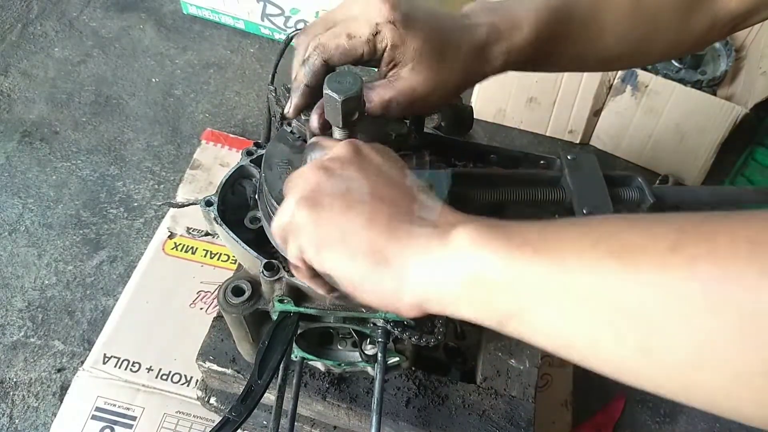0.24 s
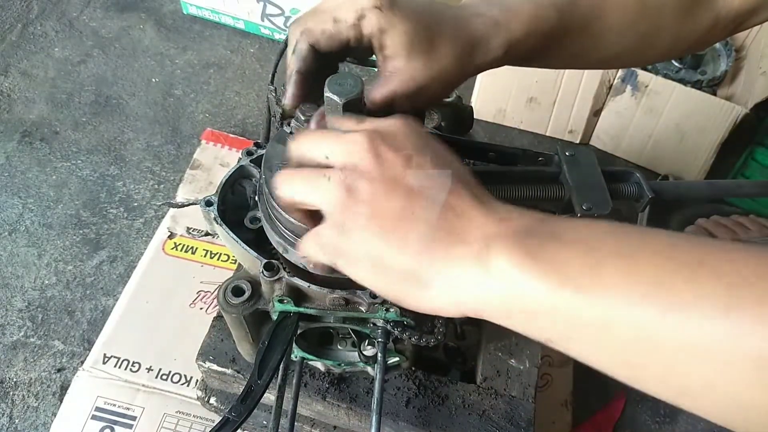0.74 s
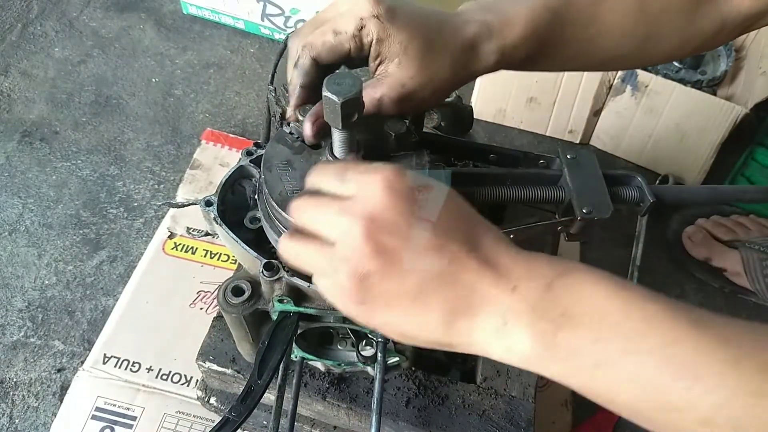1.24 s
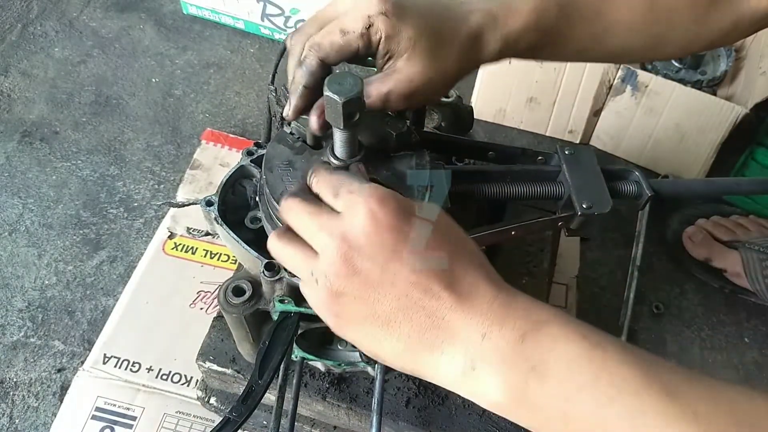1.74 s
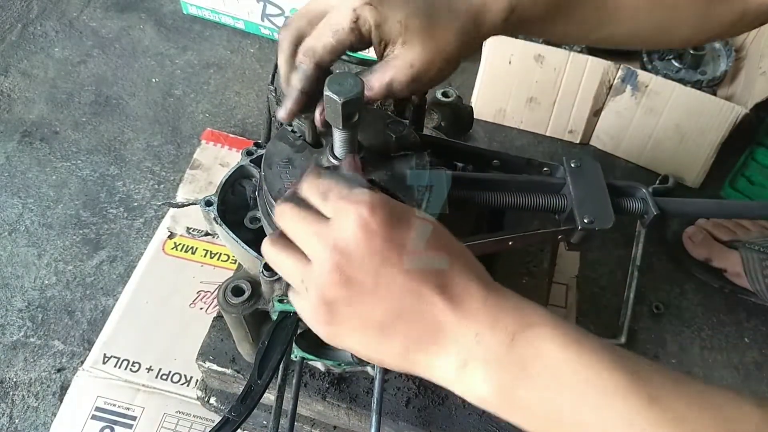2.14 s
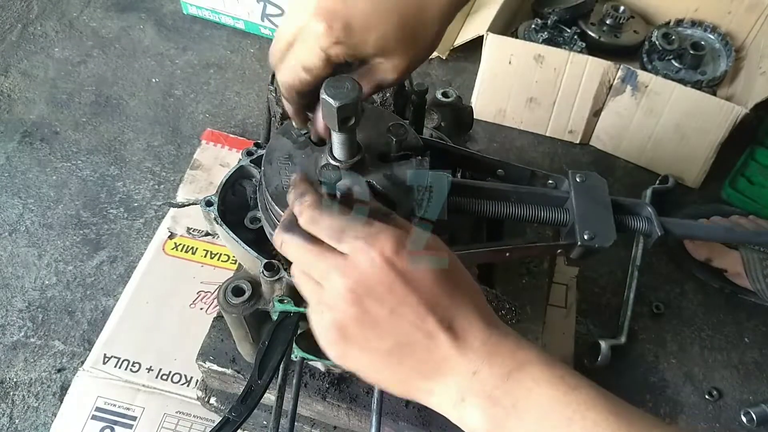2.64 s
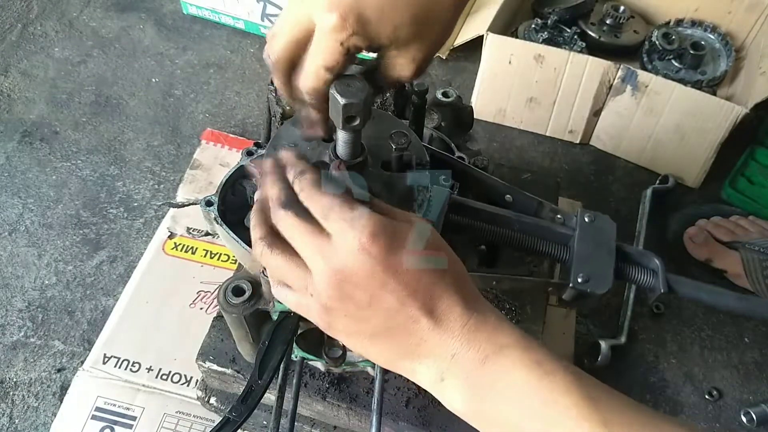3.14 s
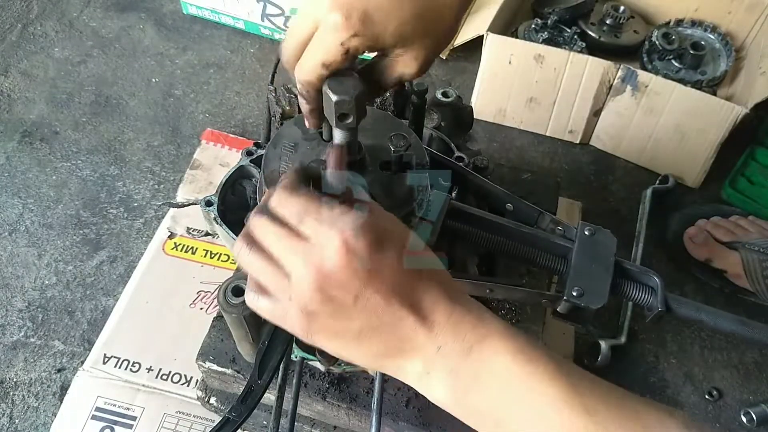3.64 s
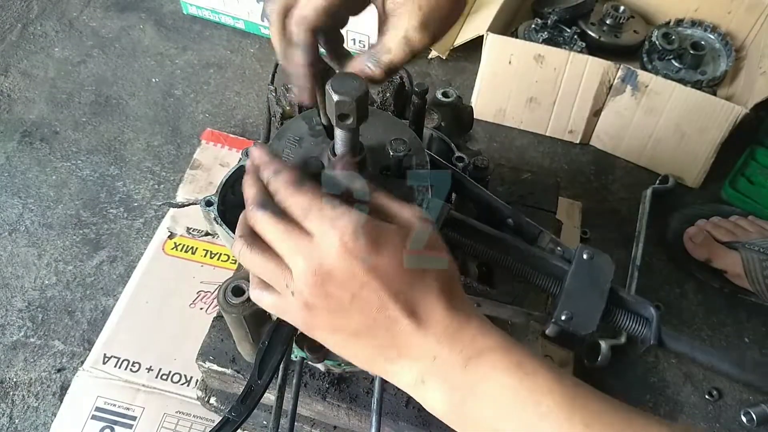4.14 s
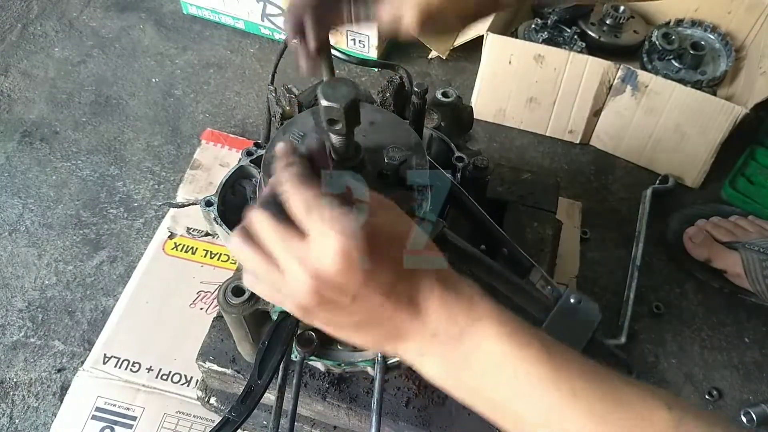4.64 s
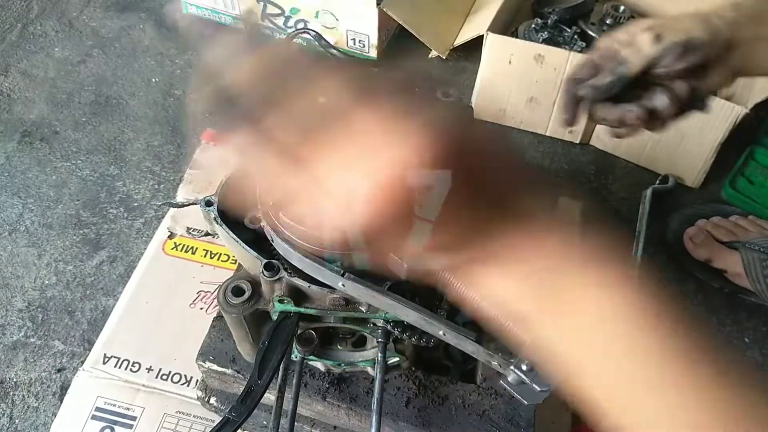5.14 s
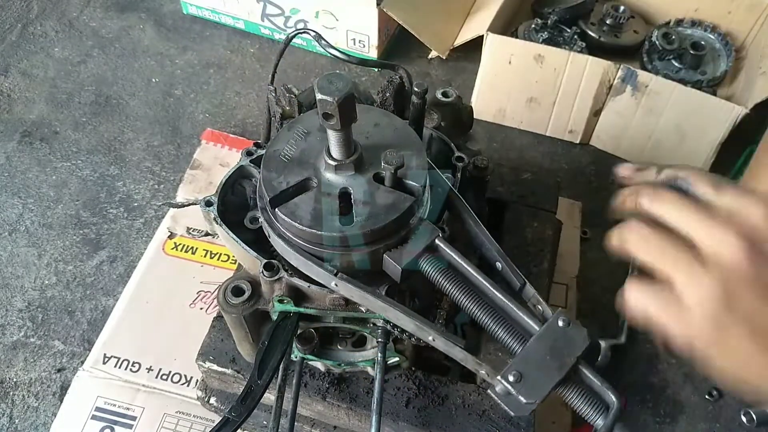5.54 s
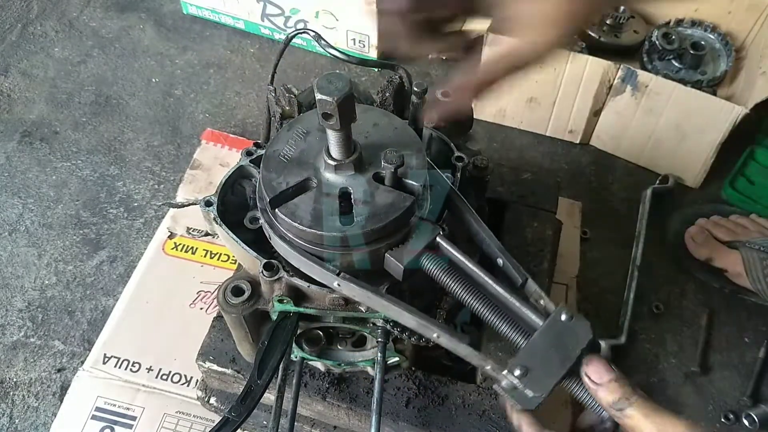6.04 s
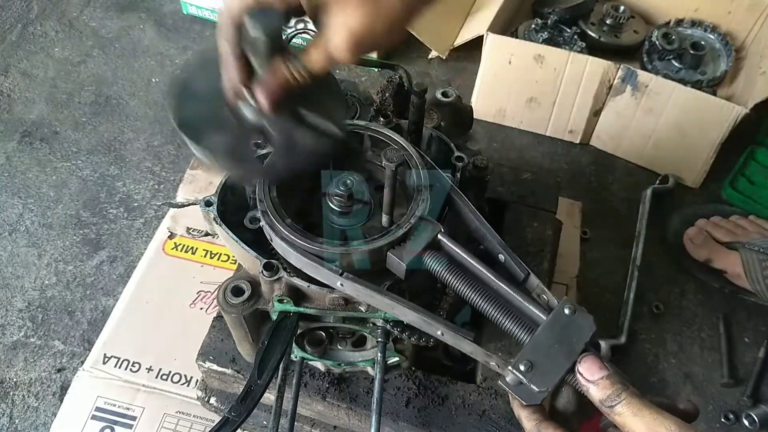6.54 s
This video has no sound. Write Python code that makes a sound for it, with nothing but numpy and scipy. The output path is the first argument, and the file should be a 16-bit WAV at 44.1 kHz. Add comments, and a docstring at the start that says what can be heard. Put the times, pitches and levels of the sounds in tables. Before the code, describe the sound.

A quiet open-air workshop yard, with low distant traffic and a thin, uneven rustle. A dove coos throughout: a short note at 0.6-0.95 s, a longer rising and dipping phrase at 1.2-2.3 s, a brief coo at 3 s, another long phrase at 3.5-4.9 s, a short one at 5.5 s and a last from 6 s to the end. The tone is round, gliding around 500-700 Hz, throaty at its faint edges and wavering with echoes. Close hands make barely audible ticks at first and a soft swish near 2.2 s. A clearer steel tick comes at 3.8 s, then scrapes, knocks and small rings crowd 4.3-5.0 s. A spanner meets concrete at 5.4 s with bright, high clinks, again at 5.75, 5.85 and 5.97 s. A soft bump, faint scrape and lingering steel tone follow around 6.4 s.

```python
"""Beside an open-air workshop a dove coos: a gliding tone whose wall echoes beat with it, so that it wavers.
Close by, hands work a puller bolt on an engine's steel flywheel: rough contacts tick, scrape, knock
the engine case and ring damped modes. A steel spanner is put down on concrete with a few bright clinks.
Steel sometimes sings on one mode, soft bands of noise swish, and distant traffic rumbles underneath."""
import sys
import numpy as np
from scipy import signal
from scipy.fft import rfft, irfft, next_fast_len
from scipy.io import wavfile
from scipy.ndimage import uniform_filter1d, map_coordinates

SR = 44100
rng = np.random.default_rng(int(sys.argv[2]) if len(sys.argv) > 2 else 0)


def put_to_file(sound):
    """Save the sound as 16-bit audio at rate SR, in the file named by the first command-line argument."""
    columns = np.atleast_2d(sound).T  # one column per channel
    safe = np.clip(columns, -1, 1)
    whole_steps = np.round(safe * 32767)
    wavfile.write(sys.argv[1], SR, whole_steps.astype(np.int16))


N = 299880

# coherence of the sound field at the two microphones: (frequency [Hz], correlation [-1 to 1])
COHERENCE = [(30, 0.17), (130, 0.83), (600, 0.86), (1100, 1), (4300, 1), (5500, 0.42), (14000, 0.054)]


def amp(db):
    """Level to amplitude ratio: 20 dB is a factor of ten."""
    return 10 ** (np.asarray(db) / 20)


def unit(x):
    """Normalization of the mean power: scale to rms 1."""
    return x / np.sqrt(np.mean(x ** 2) + 1e-20)


def along(points, hz):
    """Interpolation of (frequency [Hz], value) points on a logarithmic frequency axis."""
    f, v = np.transpose(points)
    return np.interp(np.log(hz + 1), np.log(f + 1), v)


def curves(rows):
    """Linear interpolation in time: one value per sample for each column after the time [s]."""
    s, *columns = np.transpose(rows)
    t = np.arange(N) / SR
    return [np.interp(t, s, column) for column in columns]


def wobble(rate):
    """Slow random modulation: a smooth spline through random knots, rate knots a second."""
    knots = rng.standard_normal(int(N * rate / SR) + 4)
    return map_coordinates(knots, [np.arange(N) * rate / SR])


def jitter(t, rate):
    """Angular random modulation: straight lines between random knots, rate knots per unit of axis t."""
    knots = rng.standard_normal(int(t[-1] * rate) + 4)
    return map_coordinates(knots, [t * rate], order=1)


def noise(spectrum, size, ripple_db=0):
    """Spectral shaping and partial coherence: coloured stereo noise of rms 1, less alike in the treble."""
    hz = np.fft.rfftfreq(size, 1 / SR)
    # mid and side in the ratio cos : sin of half the angle give the wanted correlation
    turn = np.arccos(np.clip(along(COHERENCE, hz), -1, 1)) / 2
    # the ripple stands for a body's many close resonances, one knot every 110 Hz
    gain = amp(along(spectrum, hz) + ripple_db * jitter(hz, 1 / 110))
    white = rfft(rng.standard_normal((2, size)))
    mid, side = irfft(white * gain * [np.cos(turn), np.sin(turn)], size)
    return unit(np.array([mid + side, mid - side]))


def patchy(x, depth_db, size):
    """Non-stationary noise: narrow bands come and go through a smoothed random time-frequency gain."""
    z = signal.stft(x, nperseg=size)[2]
    field = rng.standard_normal(z.shape[1:])
    field = uniform_filter1d(field, size=2, axis=0)
    field = uniform_filter1d(field, size=6, axis=1)
    y = signal.istft(z * amp(depth_db * unit(field)), nperseg=size)[1]
    return unit(y[:, :N])


def add(track, s, sound):
    """Linear superposition: mix a sound into the track from time s [s]."""
    start = max(round(s * SR), 0)
    track[:, start:start + sound.shape[1]] += sound[:, :max(N - start, 0)]


def swell(t, rise):
    """Gradual onset: growth from -36 dB to 0 dB by time rise [s], a softened attack."""
    return amp(-36 * np.clip(1 - t / rise, 0, 1) ** 2.0)


def decay(t, rise, t60):
    """Exponential damping: after time rise [s] the level falls 60 dB in t60 [s]."""
    return amp(-60 * np.maximum(t - rise, 0) / t60)


def rough_contact(spectrum, t, rise, t60, grain_db):
    """Rough contact excites dense, short-lived modes: a grainy noise burst swells and dies."""
    lowest_db = spectrum[0][1]
    # small parts are poor radiators of deep bass
    coloured = noise([(60, lowest_db - 22), (120, lowest_db), *spectrum], len(t), ripple_db=3.5)
    grain = amp(grain_db * jitter(t, 600))
    return coloured * swell(t, rise) * decay(t, rise, t60) * grain


def ring(modes, t, rise, rattle):
    """Modal superposition: damped sines, each wavering in level and phase through the loose contact."""
    hz, db, t60 = np.transpose(modes)[:, :, None]
    # each blow loads the steel differently and shares its energy anew
    hz = hz * (1 + .002 * rng.standard_normal(hz.shape))
    strength = amp(db + 2 * rng.standard_normal(hz.shape))
    shake, slip = rattle * np.array([[jitter(t, 118) for _ in modes] for _ in range(2)])
    phase = 2 * np.pi * (hz * t + rng.random(hz.shape)) + slip
    fade = strength * np.exp(shake) * decay(t, rise, t60)
    # short waves reach the two microphones out of step
    apart = np.arccos(np.clip(along(COHERENCE, hz), -1, 1)) / 2 * rng.choice([-1, 1], hz.shape)
    channels = [(fade * np.sin(phase + way * apart)).sum(0) for way in (1, -1)]
    tone = swell(t, rise) * np.array(channels)
    return .5 * tone / np.std(tone[:, :SR // 25])  # rms 0.5 over the first 40 ms


def yard(x):
    """Reverberation as convolution: walls and floor answer, each frequency dying at its own rate."""
    # decay of the yard: (frequency [Hz], t60 [s])
    yard_t60 = [(600, 0.59), (12000, 0.21)]
    diffuse = noise([(100, 0.011), (10000, 0.032)], SR // 2)
    hz, t, z = signal.stft(diffuse, SR, nperseg=256)
    tail = signal.istft(z * amp(-60 * t / along(yard_t60, hz)[:, None]), SR, nperseg=256)[1]
    return signal.fftconvolve(x, tail / np.linalg.norm(tail[0]), axes=1)[:, :N]


def background():
    """Broadband ambient noise: distant traffic rumble under the uneven rustle of yard and working hands."""
    # course of the two noises: (time [s], rumble level [dB], rustle level [dB])
    air = [(0, -60, -77), (1.0, -60.5, -83), (2.5, -58, -76), (5.4, -60.5, -75), (6.15, -57, -63.5),
           (6.8, -55, -85)]
    # spectrum of the traffic: (frequency [Hz], relative level [dB])
    rumble_spectrum = [(65, -30), (80, -61.5), (100, -1), (188, 4), (225, -6.5), (420, -12), (650, -15),
                       (900, -27), (4000, -35)]
    # spectrum of the rustle: (frequency [Hz], relative level [dB])
    rustle_spectrum = [(700, -27), (1150, -1.5), (1700, -2), (2600, 2), (8000, 1), (15500, -13)]
    rumble_db, rustle_db = curves(air)
    rumble = patchy(noise(rumble_spectrum, N), depth_db=5.0, size=4096)
    rumble = amp(rumble_db + 1.6 * wobble(11.0)) * rumble * amp([[-1.8], [2.3]])  # left, right [dB]
    rustle = patchy(noise(rustle_spectrum, N, ripple_db=1.5), depth_db=4.5, size=512)
    rustle = amp(rustle_db + 1.6 * wobble(14) + 1.2 * wobble(55)) * rustle
    return rumble + rustle


def swishes():
    """Band-limited noise under an envelope: soft swishes and bumps rise and fade."""
    # soft sounds: (start [s], time scale [s], centre [Hz], half-width to -4 dB [octaves], level [dB])
    soft_sounds = [(1.644, 0.18, 3566, 0.27, -63.5), (1.693, 0.16, 274.5, 0.074, -54),
                   (2.159, 0.11, 6743, 1, -58), (6.452, 0.031, 355, 0.35, -47)]
    skirt = [(-8, 90), (-2, 24), (-1, 4), (0, 0), (1, 4), (2, 24), (8, 90)]  # (half-widths, fall [dB])
    out, t = np.zeros((2, N)), np.arange(2 * SR) / SR
    for s, length, hz, octaves, db in soft_sounds:
        band = [(hz * 2 ** (k * abs(octaves)), -fall) for k, fall in skirt]
        shape = swell(t, .15 * length) * np.exp(-1.5 * (t / length) ** 2)
        add(out, s, amp(db) * shape * noise(band, len(t), ripple_db=4.5))
    return out


def singing(waver_db=2.5, waver_rad=0.76):
    """Friction-sustained vibration: rubbing keeps one mode going, wavering as the contact shifts."""
    # steel that rubs or rocks: (start [s], time scale [s], frequency [Hz], level [dB])
    sung_notes = [(0.488, 0.096, 3920, -66), (2.181, 0.3, 2625, -71.5), (2.865, 0.21, 3920, -66),
                  (2.94, 0.35, 2596, -71), (3.58, .2, 3926, -73), (3.841, 0.23, 2603, -71.5),
                  (5.157, 0.51, 2529, -73), (5.97, 0.056, 4223, -37), (6.35, 0.2, 3904, -60),
                  (6.432, 0.16, 4075, -58)]
    out, t = np.zeros((2, N)), np.arange(SR) / SR
    for s, length, hz, db in sung_notes:
        tone = np.sin(2 * np.pi * hz * t + waver_rad * jitter(t, 70))
        tone = tone * amp(db + waver_db * jitter(t, 54))
        shape = swell(t, .2 * length) * np.exp(-.4 * t / length - (t / length) ** 4)
        add(out, s, np.array([tone, tone]) * shape)
    return out


def spanner(rise=0.019, lead=0.014):
    """Impact excitation of a bar: clatter on concrete, jaws ringing high and shank bending lower."""
    # landing and settling, levels before the trims below:
    # (time [s], overall level [dB], clatter level [dB], low-mode level [dB], thud level [dB])
    landings = [(5.4307, -20, 2, -4.5, -41), (5.4393, -19, -7, -21, -45), (5.453, -30, -7.5, -16, -44),
                (5.488, -23, -14, -31.5, -30.5), (5.7401, -19.5, -25.5, -17.5, -22.5),
                (5.7524, -24, -25.5, -16.5, -37), (5.7712, -41, -16.5, 7.5, -6),
                (5.8518, -11, -30, -29, -23.5), (5.8673, -17, -32, -16, -29.5),
                (5.9629, -32, -30, -2.5, -11.5)]
    # bending modes of the shank: (frequency [Hz], level [dB], t60 [s])
    shank_modes = [(4220, -12.5, 0.15), (4270, -22.5, 0.1)]
    # modes of the jaws, t60 before the floor's damping: (frequency [Hz], level [dB], t60 [s])
    jaw_modes = [(10690, -6, .3), (10762, -4, .24), (10860, 0, .28), (10975, -3, .21), (11145, -14, .14)]
    # spectrum of the clatter: (frequency [Hz], relative level [dB])
    clatter_spectrum = [(1000, -27.5), (3300, -19), (4050, -2), (4900, -17.5), (6200, -5), (8000, -3),
                        (8480, 5), (8900, 2.5), (10125, 5.5), (11050, 8), (11800, 0.5), (15300, 4)]
    # thud of the concrete: (frequency [Hz], relative level [dB])
    ground_spectrum = [(150, -36), (430, 11), (830, 5), (1050, -4), (2400, 1.5), (5000, -1.5)]
    out, t = np.zeros((2, N)), np.arange(SR // 2) / SR
    # the floor quickly takes most of the jaws' ring
    grounded = 0.25 + np.exp(-np.maximum(t - rise, 0) / 0.012)
    for s, db, clatter_db, low_db, thud_db in landings:
        clatter = amp(clatter_db + 0.5) * rough_contact(clatter_spectrum, t, rise, t60=0.049, grain_db=4.5)
        thud = amp(thud_db) * rough_contact(ground_spectrum, t, rise, t60=0.11, grain_db=1.0)
        jaws = amp(-4.5) * grounded * ring(jaw_modes, t, rise, rattle=.45)
        shank = amp(low_db - 5) * ring(shank_modes, t, rise, rattle=0.72)
        add(out, s - lead, amp(db - 3.5) * (clatter + thud + jaws + shank))
    return (out + amp(-9.0) * yard(out)) * amp([[-.4], [.4]])  # left, right [dB]


def flywheel(rise=0.017, lead=0.013):
    """Coupled contact and resonance: each contact scrapes, knocks the engine case and rings the wheel."""
    # contacts, levels before the trims below:
    # (time [s], overall level [dB], knock level [dB], ring level [dB], treble level [dB])
    contacts = [(0.342, -53, -32, -37, -45), (0.4935, -57, 2.5, -5.5, -18), (2.8781, -53, -4.5, -17, -10),
                (3.1029, -54, -3.5, -16, -39), (3.4637, -63, 6.5, -13, -1), (3.7416, -40.5, -20, -14.5, -7),
                (3.7792, -30.5, -7, -3.5, 0.5), (3.806, -43.5, -12, -1.5, -16), (4.318, -53, -5, -17, 5.5),
                (4.376, -55.5, 12, -33, -1), (4.4352, -38, 9, -38, -20), (4.5459, -46, -14, -7, -1),
                (4.5663, -43, -14, -5, -10), (4.587, -41, -15, -3, -18), (4.612, -44, -10, -1.5, 2),
                (4.7078, -43, 0.5, -20, -5), (4.753, -47.5, 1.5, -6, -2), (4.8544, -32.5, -7, -11, 12.5),
                (4.878, -42.5, -4, -6, 0), (4.9332, -44, -10, -17, 6.5), (5.005, -40.5, -9, -1, 5),
                (5.029, -56.5, -21, -5, 26), (5.1757, -67.5, 13.5, -5, 11), (6.3566, -49, 0, -22, -22),
                (6.4426, -41, -7.5, -19, -11)]
    # modes of the wheel: (frequency [Hz], level [dB], t60 [s])
    wheel_modes = [(2336, -14, .08), (3928, -2, .18), (4215, -3, .14), (5560, -6, .15), (5640, -3, .21),
                   (6960, -10, .17), (7718, -13, .3), (10870, -10, .13), (12135, -15, .36)]
    # spectrum of the scrape: (frequency [Hz], relative level [dB])
    scrape_spectrum = [(200, -1), (450, 11.5), (900, -7.5), (1500, 3.5), (1950, -5), (2330, 8.5), (3250, 0),
                       (4150, 5.5), (4550, -2.5), (5280, 5), (5650, -1), (6200, 2.5), (7150, 7), (8500, -1),
                       (15000, 4)]
    # spectrum of the treble: (frequency [Hz], relative level [dB])
    treble_spectrum = [(4000, -37), (7800, 6), (10150, 0), (10900, 21), (11450, 5), (12150, 13),
                       (12700, -36)]
    # resonances of the engine case: (frequency [Hz], relative level [dB])
    case_spectrum = [(850, 0), (1060, 10), (1190, 26.5), (1370, 0.5), (1540, 7.5), (2800, -4), (4500, -12),
                     (7000, -10.5), (8200, -46)]
    scrape_top_hz, treble_db_per_octave = 10500, 45
    out, t = np.zeros((2, N)), np.arange(SR // 2) / SR
    for s, db, knock_db, ring_db, treble_db in contacts:
        # a softer contact has less treble and a duller scrape
        top_hz = scrape_top_hz * 2 ** (treble_db / treble_db_per_octave)
        colour = [(hz, level - 10 * np.log10(1 + (hz / top_hz) ** 10)) for hz, level in scrape_spectrum]
        scrape = amp(-5.5) * rough_contact(colour, t, rise, t60=0.16, grain_db=2.5)
        treble = amp(treble_db - 11.0) * rough_contact(treble_spectrum, t, rise, t60=0.11, grain_db=2.0)
        knock = amp(knock_db - 2.0) * rough_contact(case_spectrum, t, rise, t60=0.089, grain_db=1.0)
        tone = amp(ring_db + 6.0) * ring(wheel_modes, t, rise, rattle=0.72)
        add(out, s - lead, amp(db - 3.5) * (scrape + treble + knock + tone))
    return (out + amp(-18.5) * yard(out)) * amp([[-.3], [.3]])  # left, right [dB]


def dove(overtone_db=-29, rasp_db=3, flutter_db=6, yard_db=-17):
    """Interference of a gliding tone with its delayed echoes: they overlap and beat, so it wavers."""
    # the dove's phrases, one table each: (time [s], pitch [Hz], level before smoothing [dB])
    coos = [
        [(0.591, 522, -81), (0.645, 551, -46), (0.69, 598.5, -43), (0.81, 599, -46), (0.876, 558, -53.5),
         (0.961, 570, -105)],
        [(1.181, 473, -75), (1.285, 485, -61.5), (1.419, 568, -51.5), (1.439, 679, -38.5), (1.5, 705, -51),
         (1.677, 680.3, -35.5), (1.734, 639, -43), (1.765, 508.4, -56), (1.816, 479, -55), (1.861, 532, -49),
         (1.908, 617, -40), (1.947, 638.4, -39.5), (2.074, 571, -49), (2.12, 533.8, -43), (2.233, 504.6, -59),
         (2.321, 520, -78)],
        [(2.95, 464, -90), (2.959, 535, -43.5), (2.983, 723, -47), (3.055, 669, -50.5), (3.074, 687, -38.5),
         (3.2, 634, -47), (3.304, 620, -126)],
        [(3.533, 495.6, -79), (3.651, 470, -58.5), (3.797, 567, -57), (3.809, 661, -37.5), (3.825, 684, -54),
         (3.882, 649.3, -42), (3.982, 636.6, -43), (4.109, 623, -42.5), (4.165, 494.4, -53.5),
         (4.254, 534.5, -48.5), (4.277, 624.5, -43), (4.378, 599, -48.8), (4.462, 561.7, -51),
         (4.513, 441.4, -62), (4.588, 500, -59), (4.643, 488, -80)],
        [(4.691, 504, -78), (4.714, 502.4, -46), (4.771, 492, -53), (4.861, 454, -78.5)],
        [(5.486, 479, -91), (5.496, 528, -49), (5.519, 724.4, -49), (5.58, 679, -42.5), (5.651, 639.4, -44.5),
         (5.693, 631, -66), (5.771, 588, -74)],
        [(5.926, 498, -82.5), (6.115, 482, -59), (6.16, 589, -52.5), (6.23, 603, -57.5), (6.287, 544, -48),
         (6.303, 652, -43), (6.37, 646.5, -44.5), (6.48, 618.6, -53.5), (6.519, 627, -35.5), (6.58, 625.6, -54),
         (6.644, 606.4, -41.5), (6.659, 517, -50), (6.727, 526.7, -47.5), (6.742, 618, -41), (6.776, 591, -63)],
    ]
    # echoes from walls and roofs: (delay [s], level [dB])
    walls = [(.01832, -9.1), (.03105, -13.1), (.04311, -8.4), (.06002, -12.3), (.06668, -15.7),
             (.08082, -14.9)]
    # broad resonance of the inflated throat: (frequency [Hz], relative level [dB])
    throat = [(380, -31.0), (470, 6), (670, 4), (790, -21), (1100, -15.0), (1500, -64.5)]
    clear_db, clearing_db = -54.5, 3.5
    t = np.arange(N) / SR
    pitch, db = curves(sum(map(list, coos), []))
    calling = sum((t > coo[0][0]) & (t < coo[-1][0]) for coo in coos)
    gate = uniform_filter1d(np.minimum(calling, 1.0), size=600)
    level = amp(uniform_filter1d(db, size=500)) * gate
    # throaty while the pressure is low: 2/3 when faint, 0.4 at clear_db, towards 0 when louder
    rough = 1 / (1.5 + np.exp((db - clear_db) / clearing_db))
    phase = 2 * np.pi * np.cumsum(pitch) / SR
    # the overtone is strongest in clear notes, near a throat resonance
    resonance = 1 / (1 + ((2 * pitch - 1130) / 85) ** 8)
    overtone = amp(overtone_db) * (1 - rough) ** 2 * resonance
    tone = np.sqrt(2 * (1 - rough ** 2)) * (np.sin(phase) + overtone * np.sin(2 * phase))
    rasp = amp(rasp_db) * rough * noise(throat, N)
    flutter = amp(flutter_db * rough * wobble(60))
    voice = level * flutter * (tone + rasp)
    out = voice + amp(yard_db) * yard(voice)
    for delay, echo_db in walls:
        add(out, delay, amp(echo_db) * voice)
    return out * amp([[-.3], [.3]])  # left, right [dB]


def scene():
    """Superposition of all sources at the two microphones."""
    return background() + swishes() + singing() + spanner() + flywheel() + dove()


def record(dry, top_hz=15450):
    """Band limitation: a very steep low-pass, 3 dB down at top_hz."""
    size = next_fast_len(N + SR // 2)
    hz = np.fft.rfftfreq(size, 1 / SR)
    low_pass = 1 / np.sqrt(1 + (hz / top_hz) ** 160)
    return irfft(rfft(dry, size) * low_pass, size)[:, :N]


dry = scene()
out = record(dry)
put_to_file(out)
```